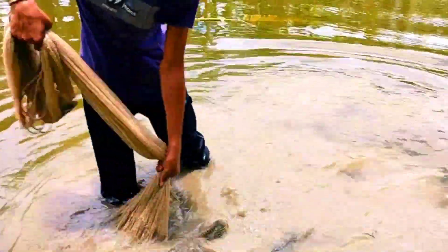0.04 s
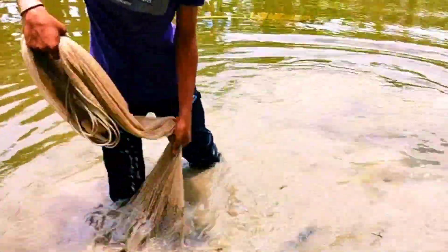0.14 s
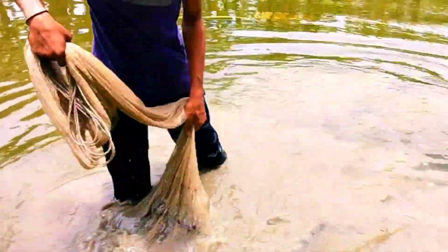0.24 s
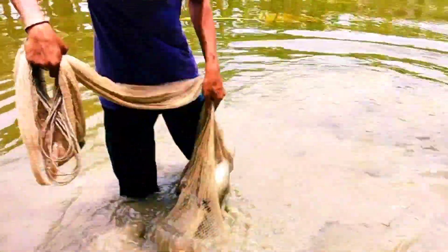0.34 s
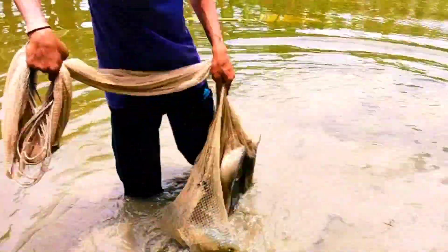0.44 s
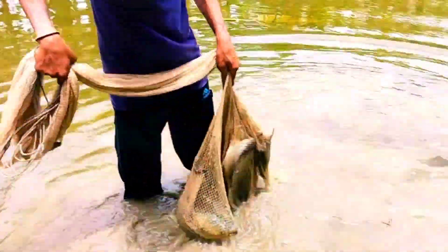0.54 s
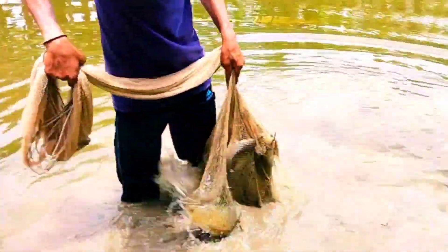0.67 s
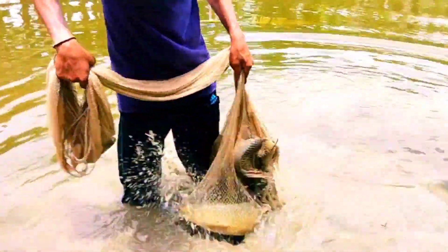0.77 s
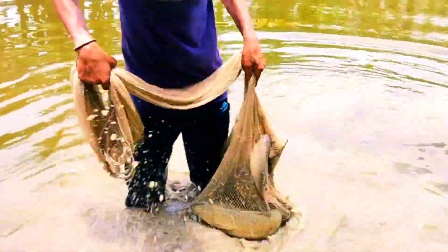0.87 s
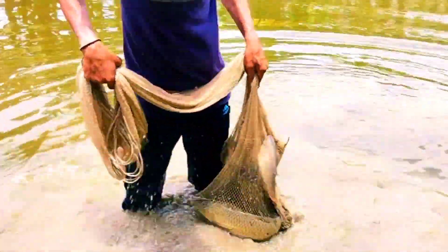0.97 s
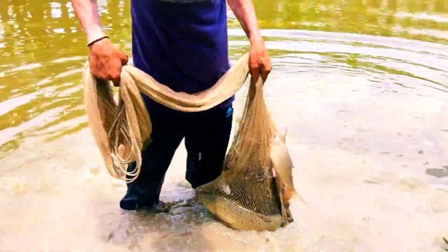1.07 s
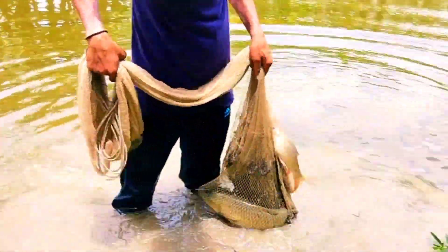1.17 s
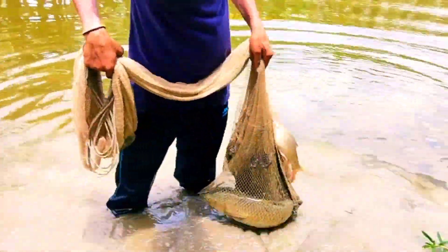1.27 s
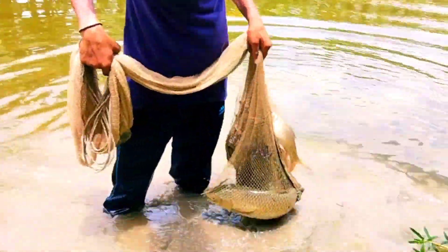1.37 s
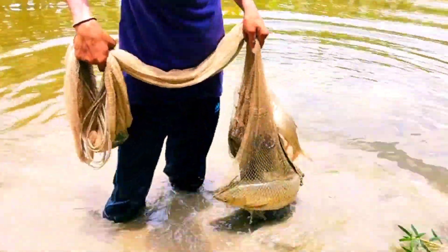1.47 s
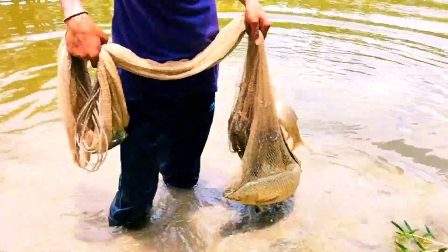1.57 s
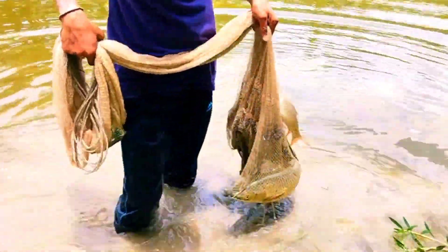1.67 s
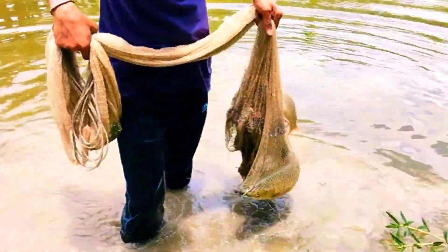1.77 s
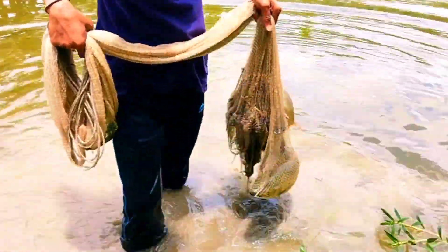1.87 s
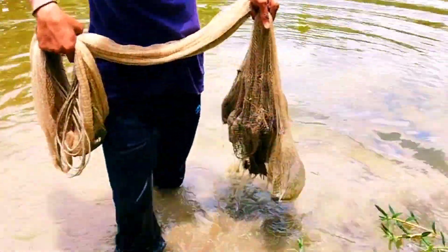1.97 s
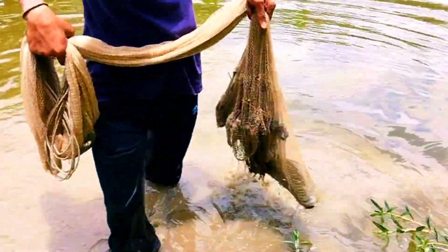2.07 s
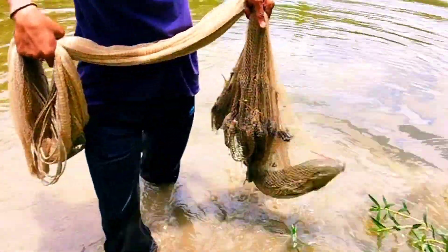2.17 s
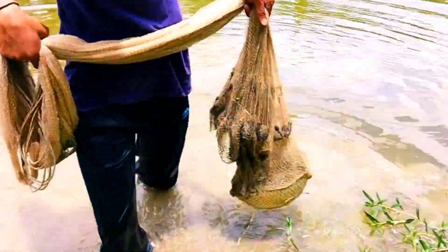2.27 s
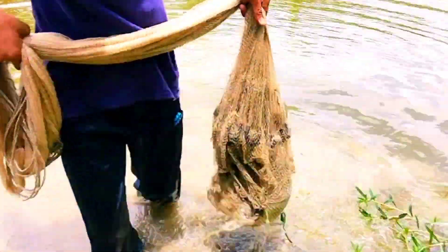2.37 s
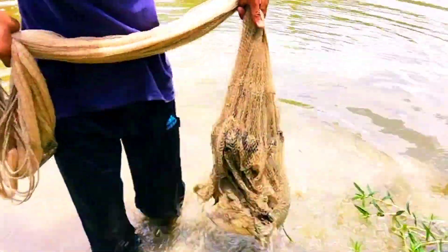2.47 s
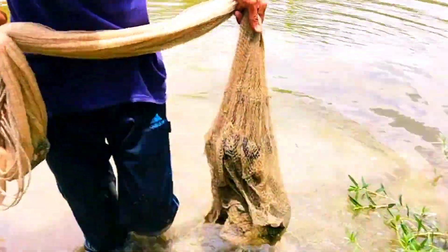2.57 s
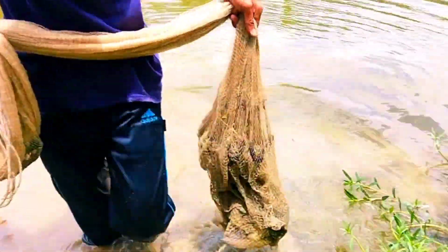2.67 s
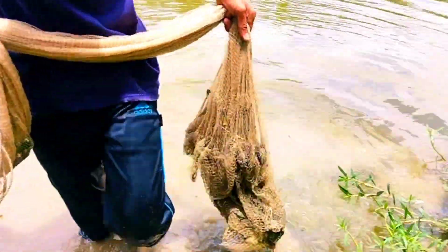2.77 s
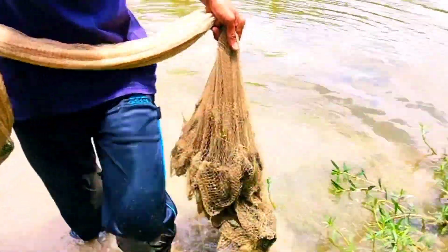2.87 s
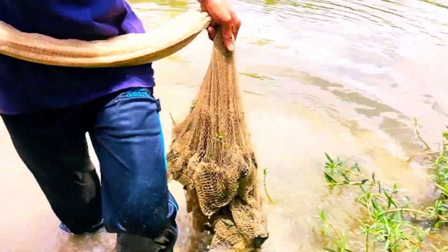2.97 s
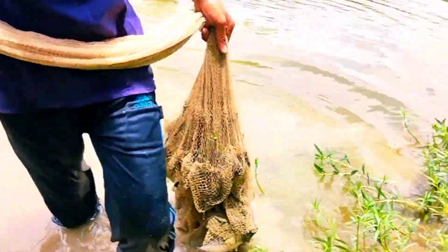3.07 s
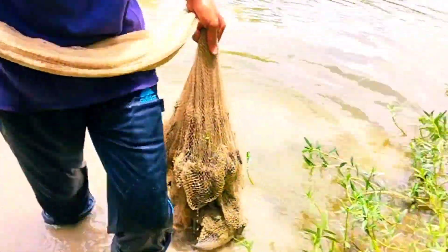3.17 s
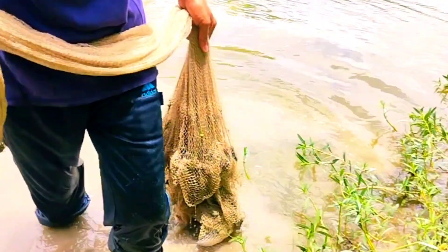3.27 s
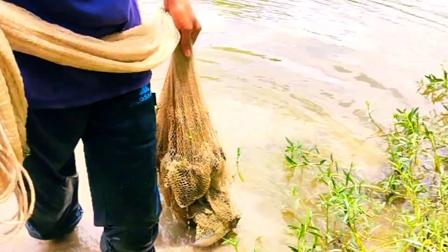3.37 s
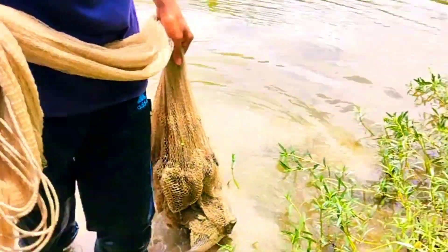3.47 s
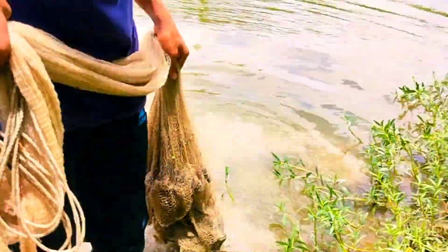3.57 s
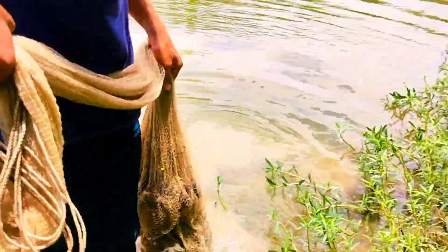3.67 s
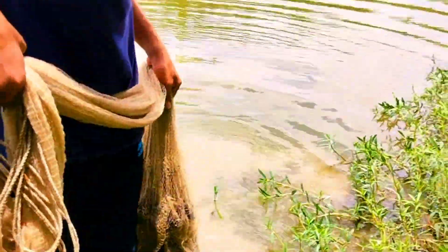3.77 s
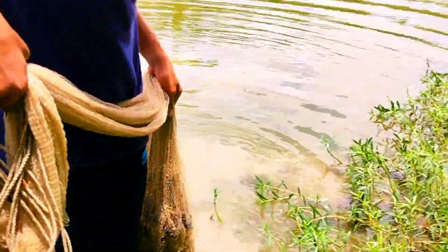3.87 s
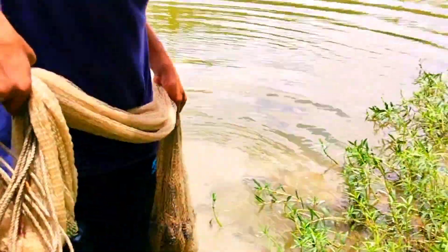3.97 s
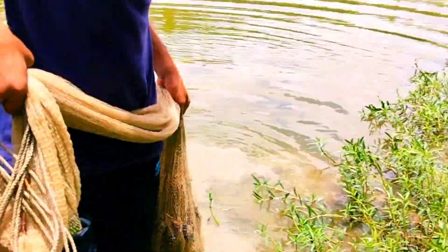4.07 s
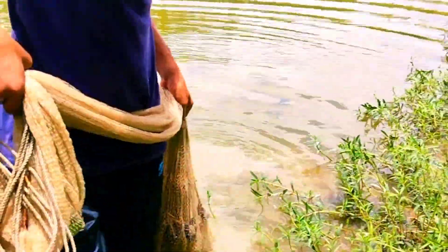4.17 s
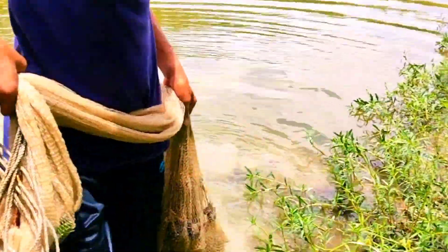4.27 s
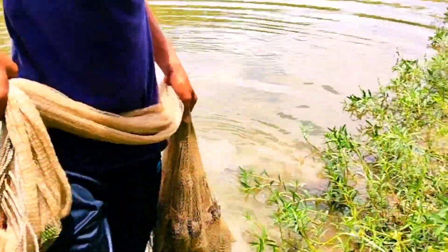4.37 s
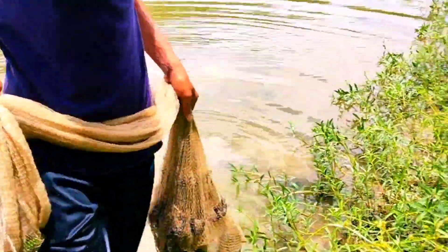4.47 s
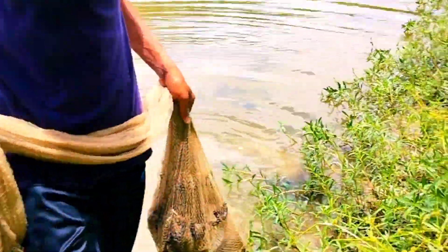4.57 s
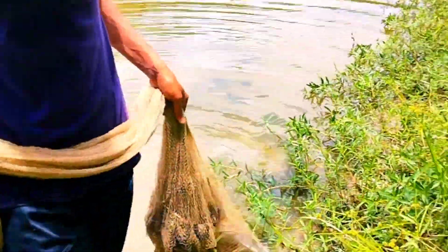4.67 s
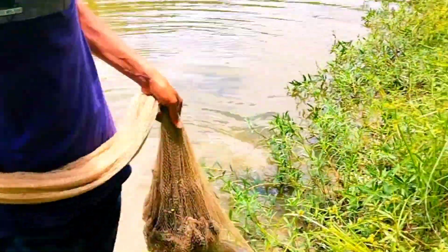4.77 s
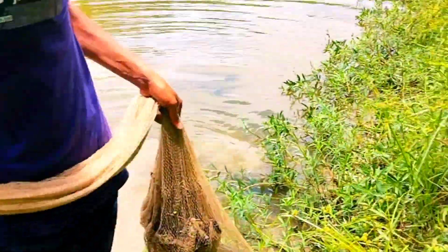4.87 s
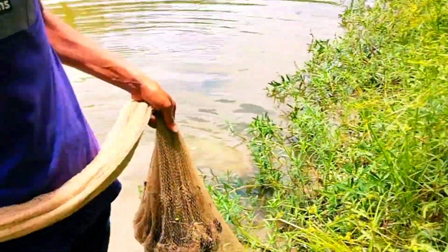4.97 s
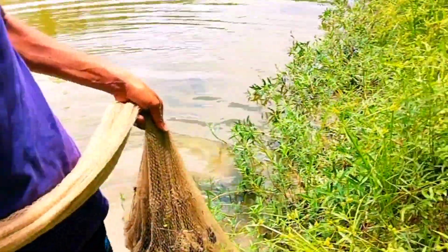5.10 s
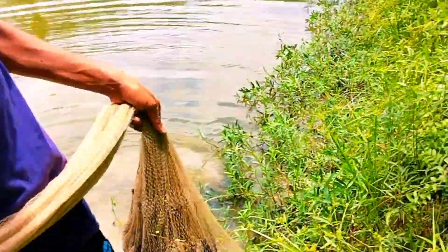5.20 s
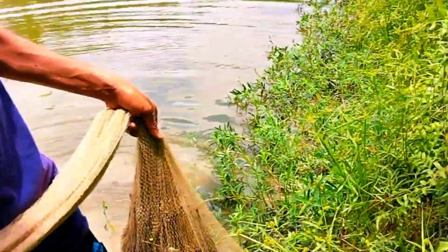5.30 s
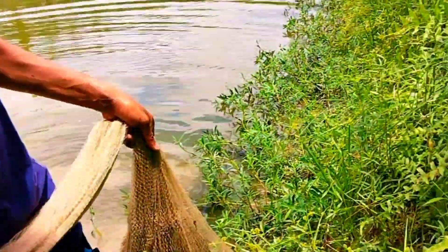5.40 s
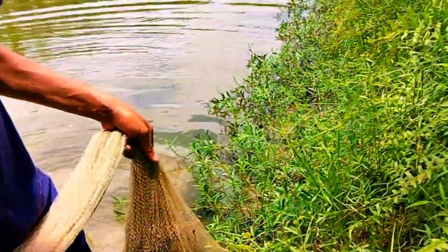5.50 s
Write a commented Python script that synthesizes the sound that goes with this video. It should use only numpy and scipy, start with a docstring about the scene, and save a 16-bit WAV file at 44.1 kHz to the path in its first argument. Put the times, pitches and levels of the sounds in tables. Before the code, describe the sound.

A sharp splash and gurgling slosh give way to dripping mesh, low wind thumps, a soft net rustle and a tiny falling squeak.

```python
"""Pond water sloshes, drips and bubbles as someone wades, hauling out a wet cast net with a fish in it.
The catch slaps the surface and throws spray; then water streams from the mesh. Legs stir up bubbles.
The water is built from ringing bubbles, tiny drop impacts and shaped noise.
Wind buffets the microphone as a noise rumble with pressure dips. The gathered net rustles close by in
dull little jerks and knocks, and a short falling squeak follows, made of a tone with overtones."""
import sys
import numpy as np
from scipy import signal
from scipy.fft import rfft, irfft, next_fast_len
from scipy.io import wavfile
from scipy.ndimage import uniform_filter1d

SR = 44100
rng = np.random.default_rng(int(sys.argv[2]) if len(sys.argv) > 2 else 0)


def waveform_to_disk(signal):
    """Save audio, clipped to [-1, 1], as 16-bit WAV at the path in sys.argv[1]."""
    frames = np.transpose(np.atleast_2d(signal))
    scaled = np.clip(frames, -1, 1) * 32767
    samples = np.round(scaled).astype(np.int16)
    wavfile.write(sys.argv[1], SR, samples)


N = 244400   # length in samples


def from_db(db):
    """Decibels to gain."""
    return 10 ** (np.asarray(db) / 20)


def rms_one(x):
    """Scale to unit power."""
    return x / np.sqrt(np.mean(x ** 2) + 1e-20)


def peak_one(x):
    """Scale to unit height."""
    return x / np.abs(x).max()


def add(track, s, sound):
    """Mix a sound into the track at time s."""
    i = int(np.clip(s * SR, 0, N - 1))
    track[i:i + len(sound)] += sound[:N - i]


def swell(s, rise_s, hold_s, fall_s):
    """Rise up to time s, hold, fall; the gain changes tenfold in each rise or fall time."""
    t = np.arange(N) / SR - s
    before = np.maximum(-t, 0) / rise_s
    after = np.maximum(t - hold_s, 0) / fall_s
    return 10 ** -np.minimum(before + after, 10)


def drift(rate):
    """Slow random wandering with spread 1: straight lines between 'rate' random points a second."""
    knots = rng.standard_normal(2000)
    return np.interp(np.arange(N) / SR * rate, np.arange(len(knots)), knots)


def band(x, low_hz, high_hz, order=2):
    """Keep mainly the pitches between two limits."""
    limits = [low_hz, min(high_hz, .45 * SR)]
    return signal.sosfilt(signal.butter(order, limits, "band", fs=SR, output="sos"), x)


def colour(x, spectrum):
    """Tint a steady texture with a spectrum that falls away steeply beyond both ends; unit power."""
    hz, db = np.transpose(spectrum)
    size = next_fast_len(N)
    log_hz = np.log(np.arange(size // 2 + 1) * SR / size + 1)
    beyond = np.abs(log_hz - np.clip(log_hz, np.log(hz[0]), np.log(hz[-1])))
    gain = from_db(np.interp(log_hz, np.log(hz), db) - 40 * beyond)
    return rms_one(irfft(rfft(x, size) * gain, size)[:N])


def bubble(hz, t60, glide):
    """A trapped air pocket swells over a cycle or two and rings; its pitch slides as its cavity changes shape."""
    t = np.arange(int(t60 * SR) + 2) / SR
    cycles = np.cumsum(hz * 2 ** (glide * t / t60)) / SR
    build_up = 1 - np.exp(-(cycles / 1.3) ** 2)
    fade = from_db(-60 * t / t60)   # t60: seconds to fade by 60 dB
    return np.sin(2 * np.pi * cycles) * fade * build_up


def bubble_cloud(count, low_hz, high_hz, cycles, glide, spread_db):
    """Many bubbles of random size, strength and damping; unit power."""
    out = np.zeros(N)
    for when, size, strength, life, slide in rng.random((count, 5)):
        hz = low_hz * (high_hz / low_hz) ** size
        t60 = cycles * (.5 + life) / hz
        gain = from_db(spread_db * strength ** 3)   # the cube makes strong bubbles rare
        add(out, when * N / SR, gain * bubble(hz, t60, glide * (2 * slide - .5)))
    return rms_one(out)


def droplets(per_s, spread_db):
    """Tiny impacts of uneven strength, arriving in clumps; unit power."""
    chance = per_s * from_db(4 * drift(40)) / SR
    born = rng.random(N) < chance
    strength = from_db(spread_db * np.minimum(rng.exponential(1, N), 4))
    return rms_one(born * strength * rng.choice([-1, 1], N))


# water draining from the mesh, before DRAIN_LIFT_DB: (time [s], level [dB])
DRAIN = [(0.0, -53.5), (0.14, -62), (0.45, -59), (0.69, -41.5), (0.8, -43.5), (0.96, -42), (1.11, -55),
         (1.4, -52.5), (1.9, -49), (2.17, -47.5), (2.57, -49), (2.98, -47.5), (3.19, -52.5), (4.03, -54.5),
         (4.24, -53), (5.03, -57), (5.21, -57.5), (5.54, -49.5)]
# each stride or heave of the net raises a surge; rise and fall span 20 dB:
# (crest time [s], rise [s], fall [s], slosh level [dB], churn level [dB], spray level [dB])
SURGES = [(.10, 0.9, 0.49, -53, -74, -61.5), (0.311, 0.36, 0.19, -49, -51.5, -54.5),
          (.395, 0.016, 0.28, -39.5, -45, -52), (0.534, 0.016, 0.088, -38.5, -55, -48),
          (0.597, 0.04, 0.14, -30.5, -34, -41), (.66, 0.038, 0.16, -43, -41, -38),
          (.74, 0.14, 0.13, -39, -54, -38.5), (.87, 0.25, 0.47, -41.5, -47.5, -48.5),
          (1.025, .04, 0.22, -54, -70, -46), (1.28, 0.46, 0.38, -56, -54.5, -61),
          (2.105, 0.1, 0.13, -47, -51, -60), (2.25, 0.27, 0.065, -50.5, -46, -58.5),
          (2.47, 0.45, 0.18, -75, -79, -66), (2.58, 0.11, 0.076, -49.5, -55, -75),
          (2.82, 0.28, 0.27, -55, -58.5, -62), (2.885, 0.035, 0.1, -44.5, -44.5, -61),
          (3.085, 0.15, 0.17, -47.5, -51, -88), (4.05, 0.11, 1, -51.5, -55, -92),
          (4.32, 0.26, 0.41, -53, -77, -52), (4.559, 0.048, .16, -49.5, -58, -51),
          (4.881, 0.18, 0.13, -59.5, -81, -62), (5.28, 0.14, 0.23, -55, -88, -86),
          (5.46, 0.21, 0.16, -45, -83, -81), (5.535, 0.064, .2, -54, -73, -66)]
DRAIN_LIFT_DB = 2
RUNOFF_DB = 1   # extra trickle thrown off by a surge, against its slosh
# slosh, churn and spray that the draining keeps up, against its trickle
LAPPING_DB, DEEP_LAPPING_DB, MIST_DB = -7, -20, -41


def water_levels():
    """Gains of slosh, churn, trickle and spray: steady draining plus the surges, added as powers."""
    drain_s, drain_db = np.transpose(DRAIN)
    drain = from_db(np.interp(np.arange(N) / SR, drain_s, drain_db) + DRAIN_LIFT_DB)
    power = np.outer(from_db([LAPPING_DB, DEEP_LAPPING_DB, 0, MIST_DB]), drain) ** 2
    for s, rise_s, fall_s, slosh_db, churn_db, spray_db in SURGES:
        crest = from_db([slosh_db, churn_db, slosh_db + RUNOFF_DB, spray_db])
        power += np.outer(crest ** 2, swell(s, rise_s, 0, fall_s) ** 2)
    return np.sqrt(power)


# tint of the trickle as heard, with a deep gap near 8 kHz that is not made by the water:
# (frequency [Hz], relative level [dB per Hz])
TRICKLE_TINT = [(1100, -7.5), (1700, -3.5), (2300, -3), (2900, 0), (3600, 3), (4100, -2.5), (4600, -10.5),
                (6000, -17.5), (8000, -86), (10500, -24.5), (12300, -17), (15500, -30.5)]


def trickle():
    """Threads of water fall from the mesh in spurts: drops tick, many leave a small bubble, a few chirp."""
    plinks = bubble_cloud(count=1500, low_hz=1514, high_hz=5023, cycles=77, glide=0.706, spread_db=9.5)
    chirps = bubble_cloud(count=130, low_hz=1300, high_hz=6200, cycles=70, glide=.55, spread_db=10)
    ticks = .45 * rng.standard_normal(N) + droplets(per_s=1100, spread_db=5)
    spurts = from_db(.9 * drift(45))
    patter = from_db(-7.5) * colour(plinks, TRICKLE_TINT) + from_db(-4.5) * colour(ticks, TRICKLE_TINT)
    return spurts * patter + from_db(-8.5) * colour(chirps, TRICKLE_TINT)


# tint of the small waves: (frequency [Hz], relative level [dB per Hz])
SLOSH_TINT = [(450, -18.5), (650, -5.5), (850, -5), (1400, 3.5), (1800, -2.5), (2500, 3)]


def slosh():
    """Small waves break on the legs: gurgling bubbles over a soft wash."""
    gurgle = bubble_cloud(count=1000, low_hz=620.8, high_hz=1973, cycles=47.7, glide=0.57, spread_db=13.5)
    wash = rng.standard_normal(N) * from_db(.5 * drift(50)) + droplets(per_s=600, spread_db=4.0)
    return from_db(-2) * colour(gurgle, SLOSH_TINT) + from_db(-3) * colour(wash, SLOSH_TINT)


# tint of the deep churning: (frequency [Hz], relative level [dB per Hz])
CHURN_TINT = [(230, -1), (350, -5), (500, 2.5), (680, 2), (850, -2), (1200, -36)]


def churn():
    """Big pockets of air are folded under and gulp, with rough splashing over them."""
    gulps = bubble_cloud(count=600, low_hz=335.4, high_hz=888, cycles=20.5, glide=0.12, spread_db=12)
    splashing = droplets(per_s=940, spread_db=4.5)
    return from_db(-5.5) * colour(gulps, CHURN_TINT) + from_db(-8.5) * colour(splashing, CHURN_TINT)


# tint of the finest drops: (frequency [Hz], relative level [dB per Hz])
SPRAY_TINT = [(3500, 15), (4800, 1), (6000, 0.5), (7800, -2), (9500, -6), (12500, -6.5), (15500, -11.5)]


def spray():
    """The finest drops crackle and ping over a thin fizz."""
    pings = bubble_cloud(count=350, low_hz=4800, high_hz=14000, cycles=60, glide=.15, spread_db=22)
    crackle = droplets(per_s=380, spread_db=3.5)
    fizz = rng.standard_normal(N)
    drops = from_db(-1.0) * colour(crackle, SPRAY_TINT) + from_db(-8.5) * colour(pings, SPRAY_TINT)
    return drops + from_db(1) * colour(fizz, SPRAY_TINT)


# gusts on the microphone: (start of full strength [s], length [s], level [dB])
GUSTS = [(.06, 0.057, -45), (0.214, 0.35, -48), (0.392, 0.017, -37.5), (0.665, 0.018, -40.5),
         (1.03, 0.28, -45.5), (1.398, 0.035, -43), (1.556, 0.39, -43.5), (1.83, 0.041, -37.5),
         (1.98, 0.5, -57), (2.895, 0.033, -54.5), (3.04, 0.094, -73), (4.042, 0.36, -58.5),
         (4.48, 0.35, -59.5), (4.68, 0.049, -52.5)]
# tint of the wind rumble: (frequency [Hz], relative level [dB per Hz])
RUMBLE_TINT = [(20, -42), (45, -13.5), (80, 2), (130, 4.5), (200, -4), (300, -13.5), (500, -20.5),
               (900, -37)]
GUST_RISE_S, GUST_FALL_S, BREEZE_DB = 0.022, .14, -83   # rise and fall span 20 dB


def wind_rumble():
    """Eddies at the microphone port make a lumpy rumble in gusts."""
    gust_power = np.zeros(N)
    for s, length_s, db in GUSTS:
        gust_power += (from_db(db) * swell(s, GUST_RISE_S, length_s, GUST_FALL_S)) ** 2
    eddies = colour(rng.standard_normal(N), RUMBLE_TINT)
    eddies /= np.sqrt(uniform_filter1d(eddies ** 2, size=SR // 25) + 1e-9)   # gusts alone set the slow level
    return (np.sqrt(gust_power) + from_db(BREEZE_DB)) * eddies


# wind thumps on the microphone and, near 4.2 s, knocks of the rubbing net; level before the bass is thinned:
# (time [s], peak level [dB], rough pitch [Hz])
THUMPS_AND_KNOCKS = [(0.104, -27, 105), (1.309, -29.5, 159), (1.427, -23.5, 196), (1.571, -27.5, 171),
                     (1.594, -26, 230), (1.655, -22.5, 196), (1.710, -24, 152), (1.729, -26, 182),
                     (1.758, -24, 185), (1.817, -18, 142), (1.8558, -17, 186), (1.875, -23.5, 206),
                     (1.907, -27, 206), (2.006, -20.5, 111), (2.043, -25.5, 166), (2.211, -30, 138),
                     (2.381, -33, 117), (4.207, -29, 710), (4.213, -28.5, 386), (4.219, -25, 550),
                     (4.23, -24.5, 480), (4.727, -28, 81)]


def thumps_and_knocks():
    """Sudden dips of pressure: slow ones thump like wind, quicker ones knock like the net."""
    out, t = np.zeros(N), np.arange(-SR // 40, SR // 40) / SR
    for s, db, hz in THUMPS_AND_KNOCKS:
        # bending a smooth bump twice gives a dip between two soft shoulders
        bump = np.exp(-np.hypot(1.5 * np.pi * hz * t, 1.5))
        dip = np.gradient(np.gradient(bump))
        add(out, s + t[0], from_db(db) * peak_one(dip))
    return band(out, 112, 3000)   # the microphone passes little deep bass


# single bubbles, level before each one builds up and fades:
# (time [s], starting pitch [Hz], level [dB], 60 dB fade time [s], pitch glide [octaves per fade time])
BUBBLES = [(.108, 887, -36.5, 0.052, -0.94), (0.459, 1063, -23.5, 0.029, -0.21),
           (.469, 452, -29.5, 0.11, 0.12), (0.541, 1407, -30.5, .043, 0.03),
           (0.5935, 1427, -5, 0.012, 0.15), (.593, 490, -28, 0.11, 0.32),
           (.616, 625, -29.5, 0.034, 0.00068), (.733, 3500, -26.5, 0.056, 0.12),
           (0.793, 586, -28, 0.077, 0.018), (.846, 484, -25, 0.079, 0.17), (.869, 494, -17, 0.068, -0.061),
           (0.934, 3690, -21.5, 0.015, 0.067), (0.9478, 3500, -23, 0.018, 0.29),
           (1.06, 2360, -19.5, 0.019, 0.33), (1.110, 1210, -31.5, 0.065, -0.047),
           (1.122, 3770, -22.5, .013, -0.15), (1.641, 3800, -21, 0.0072, 0.16),
           (1.906, 982, -40.5, 0.076, 1), (2.099, 3450, -30.5, 0.046, 0.47), (2.117, 610, -28, 0.036, .3),
           (2.224, 526, -34, 0.039, 1.7), (2.240, 690, -33, 0.036, 1.3), (2.254, 1000, -31.5, 0.047, 1.1),
           (2.515, 373, -41, 0.094, 0.6), (2.578, 1386, -32, 0.053, -0.2), (2.6762, 3690, -27, 0.021, 0.75),
           (2.71, 1550, -33, 0.053, 0.26), (2.8824, 4010, -20, 0.018, 0.16),
           (2.884, 2290, -15, 0.0072, .47), (3.0313, 2980, -16.5, 0.0072, -.1),
           (3.0757, 1540, -22.5, 0.028, 0.2), (3.353, 3600, -35, 0.045, .2),
           (3.397, 4270, -28.5, 0.017, -0.26), (3.485, 1695, -30, 0.028, -.24),
           (3.626, 378, -53, .08, -0.041), (3.693, 375, -43, 0.078, -0.01),
           (4.105, 1450, -33, 0.063, -0.36), (4.328, 2114, -34, 0.11, 0.48),
           (4.816, 1480, -32, .042, -0.97), (5.274, 1194, -25.5, .03, 1.06), (5.332, 883, -40.5, 0.17, 1.5),
           (5.395, 1910, -34, 0.04, .33), (5.425, 1586, -26, 0.027, -0.49),
           (5.4526, 2310, -19.5, 0.014, 0.026), (5.467, 950, -26, 0.052, 0.2),
           (5.471, 1293, -18, 0.021, -0.26)]


def plops():
    """The bubbles that stand out of the water's murmur, each a ringing air pocket."""
    out = np.zeros(N)
    for s, hz, db, t60, glide in BUBBLES:
        add(out, s, from_db(db) * bubble(hz, t60, glide))
    return out


# smacks of water on water: (time [s], peak level of the kick [dB], kick pitch [Hz],
# 60 dB fade time of the noise [s], fine spray level against the kick [dB])
SMACKS = [(0.1551, -28, 3580, 0.015, -14), (.459, -25, 2240, 0.032, -13.5), (.530, -31, 2440, 0.021, -20),
          (0.5899, -10, 2230, 0.019, -24), (.610, -28, 2650, 0.023, -25), (.8605, -22.5, 3000, 0.011, -29),
          (.903, -22.5, 1850, 0.018, -29), (1.0134, -19, 3840, 0.036, -32),
          (1.059, -18.5, 3500, 0.011, -16), (1.110, -19.5, 4200, 0.028, -22),
          (1.545, -45.5, 3500, 0.0081, 5), (2.096, -26.5, 3680, 0.1, -16.5), (2.249, -26, 3880, 0.016, -16),
          (2.278, -27, 3320, 0.0049, -21), (2.507, -41.5, 3500, 0.016, -1), (2.572, -28, 2300, 0.018, -33),
          (2.689, -42, 3500, 0.024, -3.5), (3.075, -21.5, 2730, 0.0074, -41),
          (3.154, -16.5, 1350, 0.0026, -53), (4.716, -31.5, 3500, .023, 0.5),
          (4.813, -30.5, 3370, 0.023, -31), (5.279, -46, 2950, 0.013, -3), (5.327, -46, 3280, .013, 3),
          (5.462, -23, 2330, 0.025, -31)]


def smacks():
    """A sharp pressure kick, a short splatter behind it, and a puff of fine spray."""
    out, t = np.zeros(N), np.arange(SR // 8) / SR
    for s, db, hz, t60, spray_db in SMACKS:
        coarse, fine = rng.standard_normal((2, len(t))) * from_db(-60 * t / t60)
        kick = np.sin(2 * np.pi * hz * t) * t * np.exp(-1.6 * hz * t)   # a few cycles at most
        kick = band(kick, 0.3 * hz, 4600)
        splatter = band(coarse, .5 * hz, min(1.53 * hz, 4400), order=3)
        puff = band(fine, 3100, 17000)
        smack = peak_one(kick) + from_db(-9.0) * peak_one(splatter) + from_db(spray_db) * peak_one(puff)
        add(out, s, from_db(db) * smack)
    return out


def bank(x):
    """Quickly fading scatter from the wader and the grassy bank: a short noise tail behind each sound."""
    t = np.arange(SR // 4) / SR
    fade = from_db(-60 * t / 0.11) * (t > .004)   # nothing comes back in the first 4 ms
    scatter = band(rng.standard_normal(len(t)), 410, 9400) * fade
    return signal.fftconvolve(x, scatter / np.sqrt(np.sum(scatter ** 2)))[:N]


# tint of the rustling mesh: (frequency [Hz], relative level [dB per Hz])
RUSTLE_TINT = [(40, -85), (130, 0.5), (350, 1), (700, -9), (1300, -4.5), (2500, -15)]
# the net is gathered in one pull; rise and fall span 20 dB
PULL_S, PULL_LENGTH_S, PULL_RISE_S, PULL_FALL_S, PULL_DB = 3.945, 0.497, .01, 0.035, -50.5


def net():
    """Wet mesh slips over cloth in dull little jerks."""
    jerks = colour(droplets(per_s=300, spread_db=4), RUSTLE_TINT)
    return from_db(PULL_DB) * swell(PULL_S, PULL_RISE_S, PULL_LENGTH_S, PULL_FALL_S) * jerks


SQUEAK_S, SQUEAK_RISE_S, SQUEAK_FALL_S, SQUEAK_DB = 4.738, 0.011, 0.027, -39.5
SQUEAK_HZ, SQUEAK_SAG_HZ_PER_S = 536, 3900


def squeak():
    """One brief tone with two weaker overtones; it sags as it fades."""
    fading_s = np.clip(np.arange(N) / SR - SQUEAK_S, 0, SQUEAK_FALL_S)
    phase = 2 * np.pi * np.cumsum(SQUEAK_HZ - SQUEAK_SAG_HZ_PER_S * fading_s) / SR
    tone = sum(from_db(-9 * k) * np.sin((k + 1) * phase) for k in range(3))
    return from_db(SQUEAK_DB) * swell(SQUEAK_S, SQUEAK_RISE_S, 0, SQUEAK_FALL_S) * tone


def scene():
    """Water, net, squeak and wind at one microphone."""
    sloshing, churning, trickling, spraying = water_levels()
    water = trickling * trickle() + sloshing * slosh() + churning * churn() + spraying * spray()
    wind_and_knocks = wind_rumble() + thumps_and_knocks()
    drops = plops() + smacks()
    echo = from_db(-18) * bank(drops)
    mix = water + wind_and_knocks + drops + echo + net() + squeak()
    return mix[None]   # one channel


CUTOFF_HZ = 15900


def record(dry):
    """A steep low-pass filter removes the very top of the treble."""
    return signal.sosfilt(signal.ellip(10, .2, 80, CUTOFF_HZ, fs=SR, output="sos"), dry)


dry = scene()
out = record(dry)
waveform_to_disk(out)
```